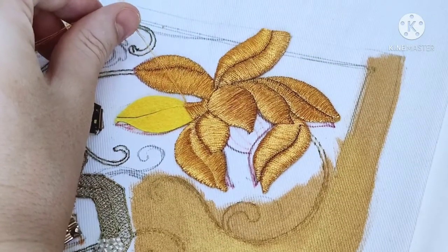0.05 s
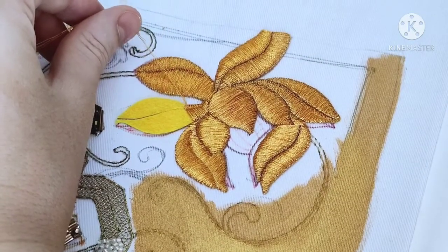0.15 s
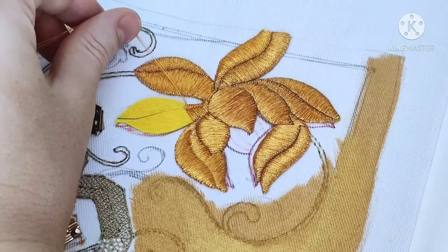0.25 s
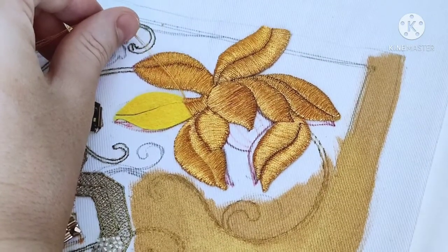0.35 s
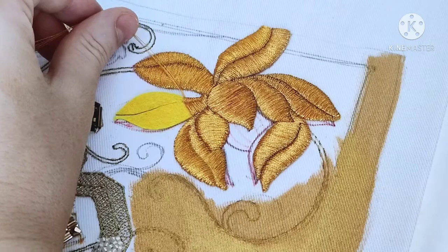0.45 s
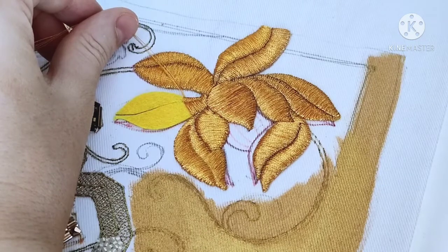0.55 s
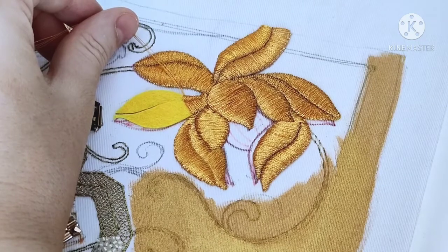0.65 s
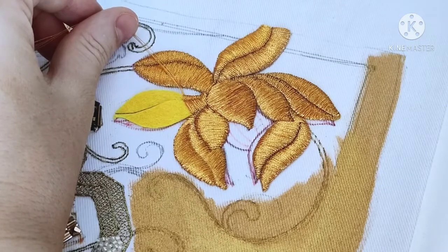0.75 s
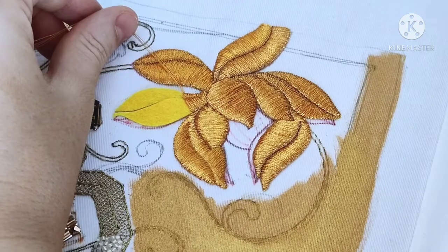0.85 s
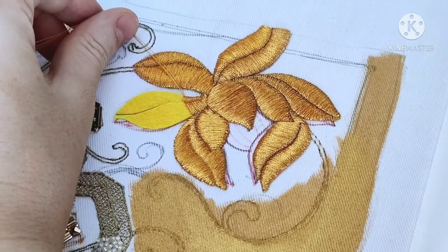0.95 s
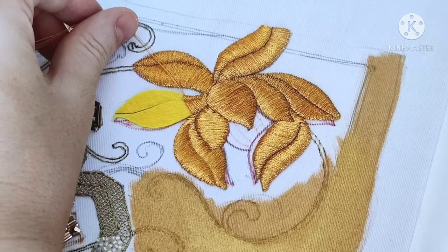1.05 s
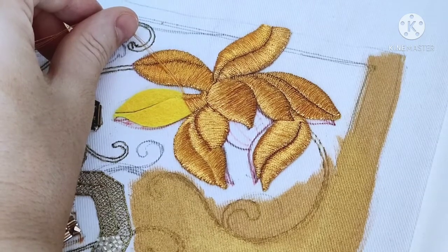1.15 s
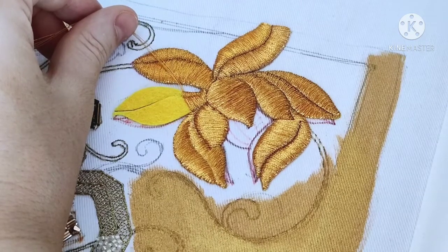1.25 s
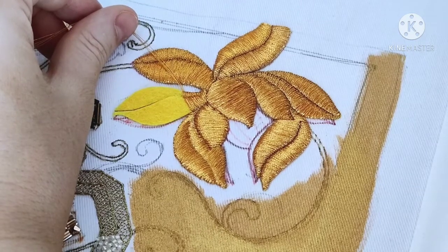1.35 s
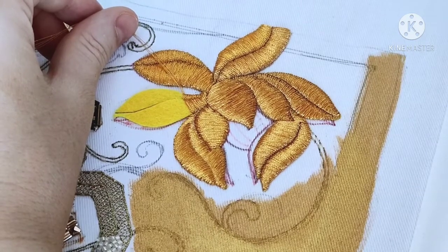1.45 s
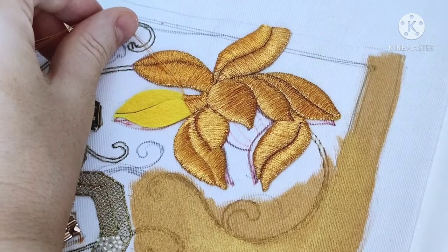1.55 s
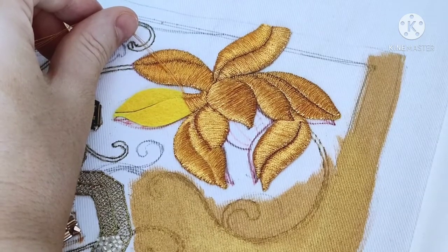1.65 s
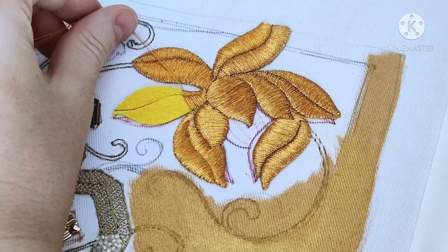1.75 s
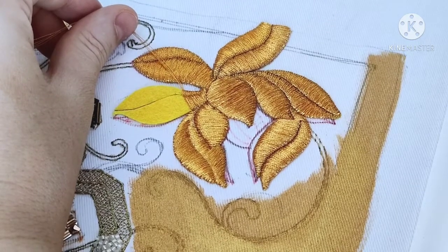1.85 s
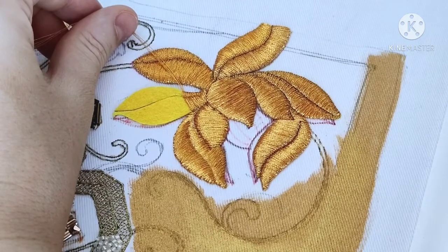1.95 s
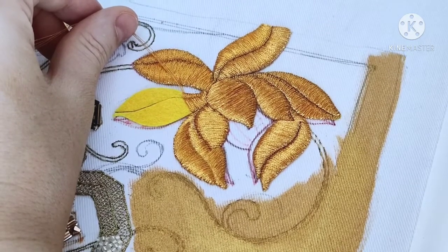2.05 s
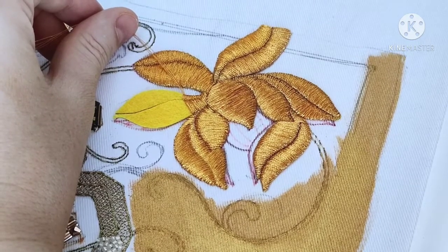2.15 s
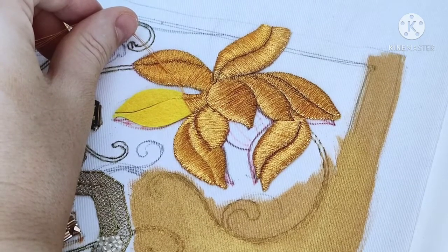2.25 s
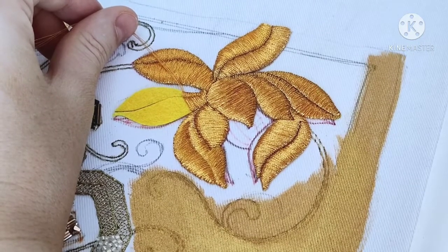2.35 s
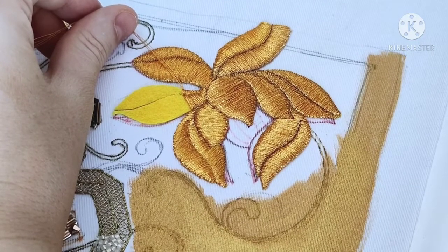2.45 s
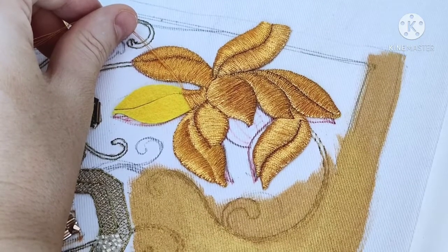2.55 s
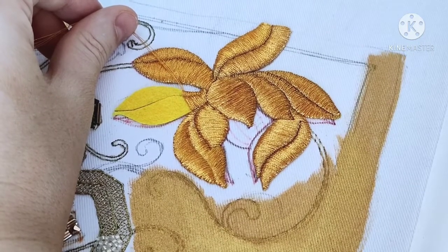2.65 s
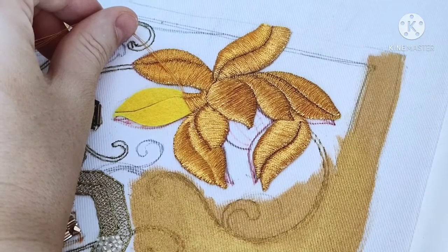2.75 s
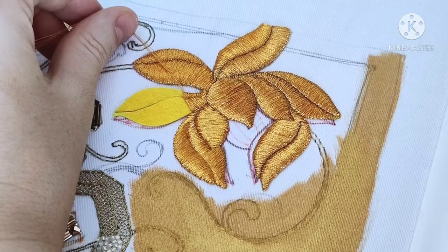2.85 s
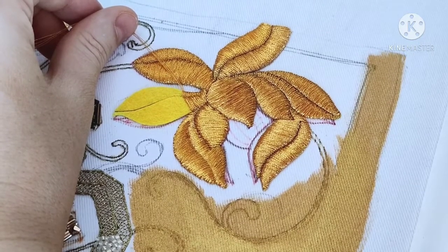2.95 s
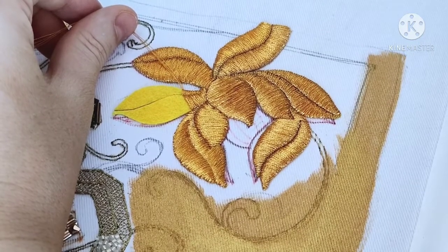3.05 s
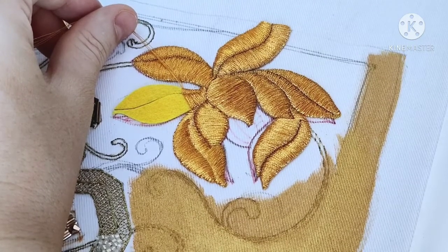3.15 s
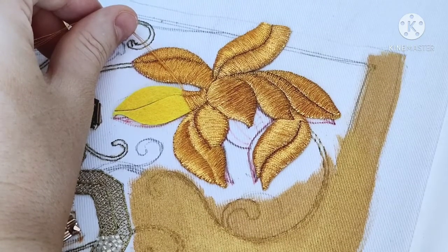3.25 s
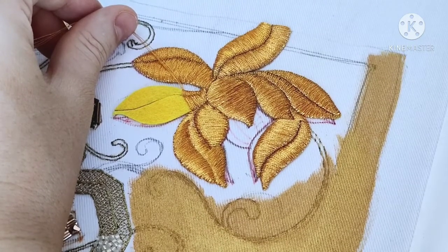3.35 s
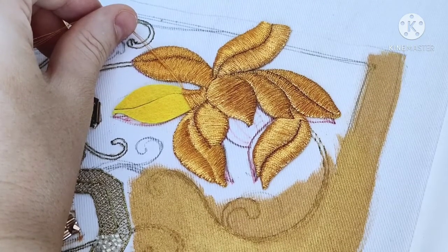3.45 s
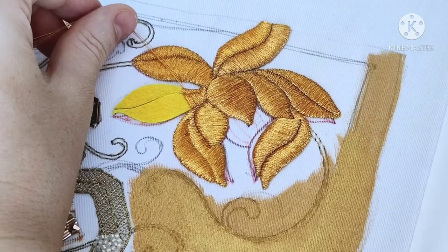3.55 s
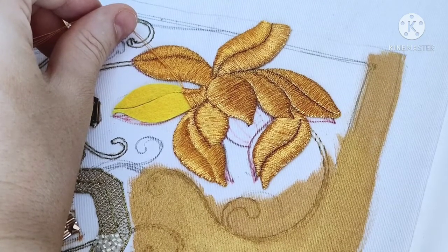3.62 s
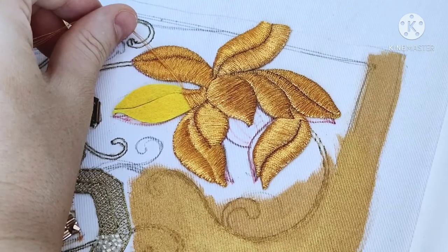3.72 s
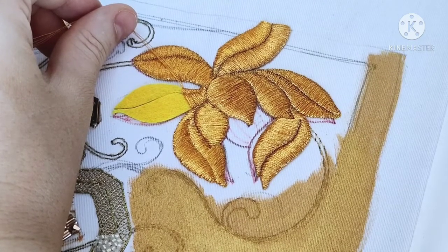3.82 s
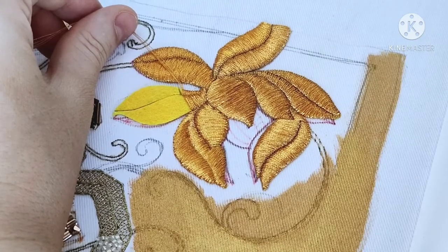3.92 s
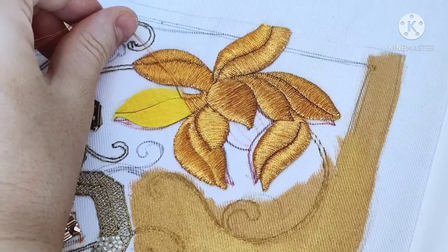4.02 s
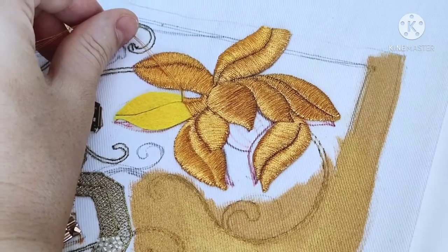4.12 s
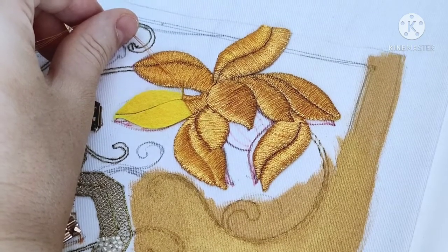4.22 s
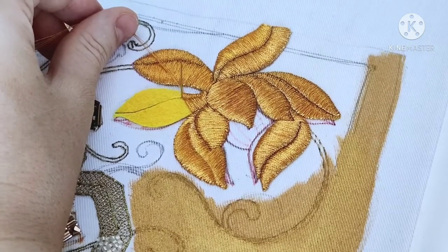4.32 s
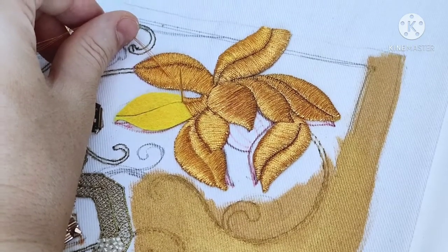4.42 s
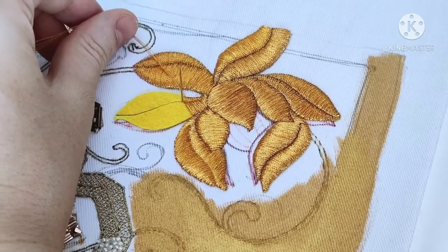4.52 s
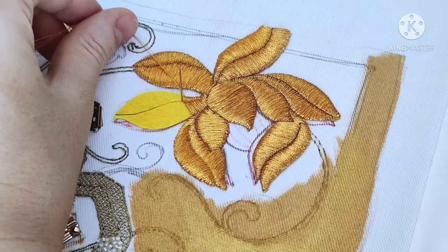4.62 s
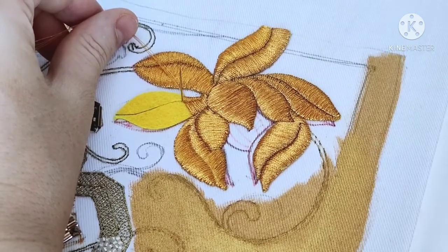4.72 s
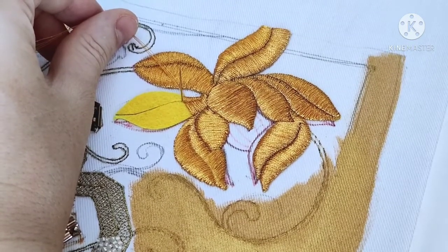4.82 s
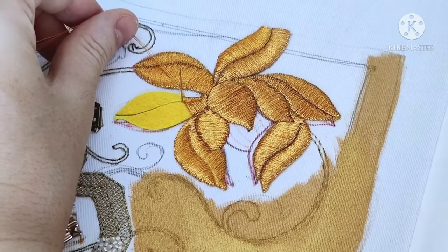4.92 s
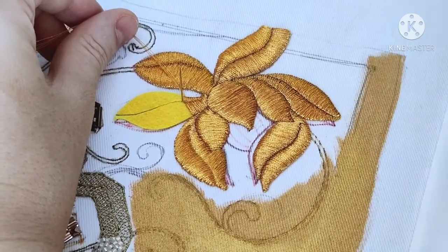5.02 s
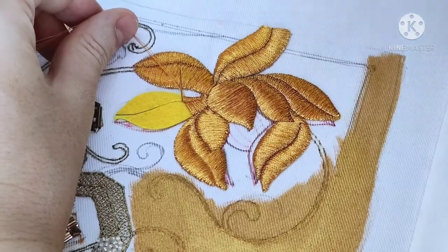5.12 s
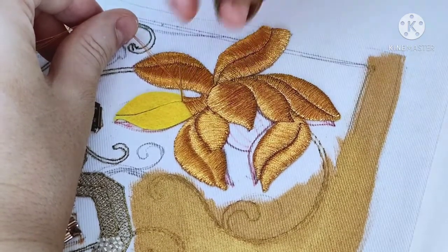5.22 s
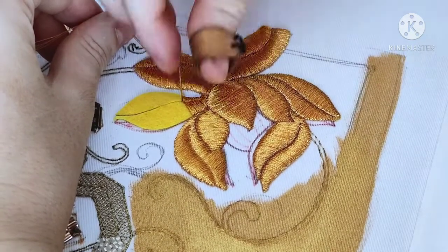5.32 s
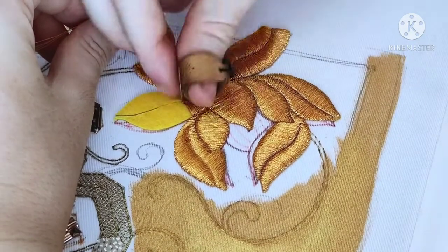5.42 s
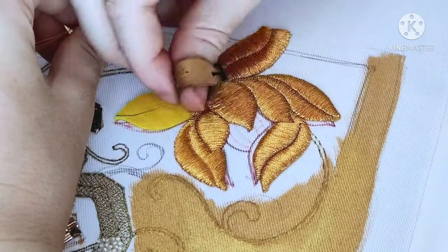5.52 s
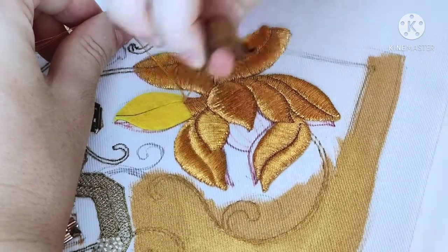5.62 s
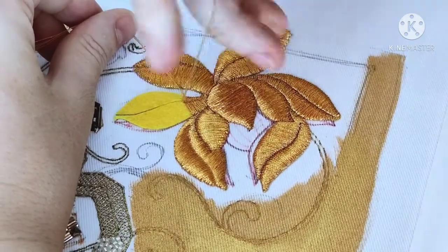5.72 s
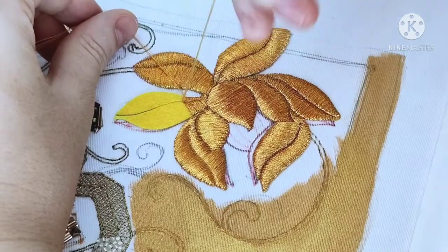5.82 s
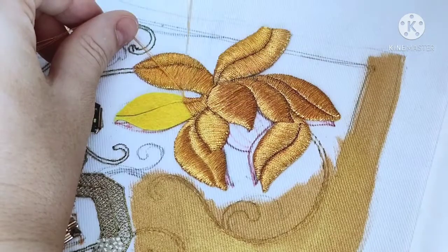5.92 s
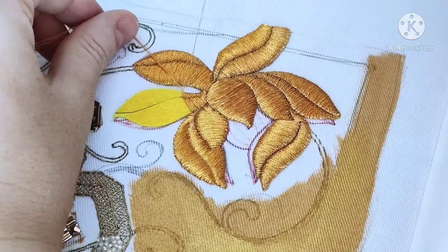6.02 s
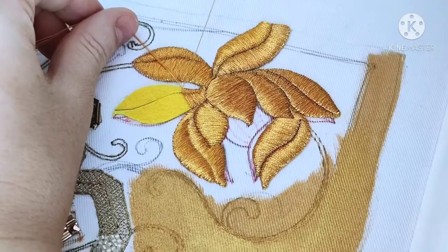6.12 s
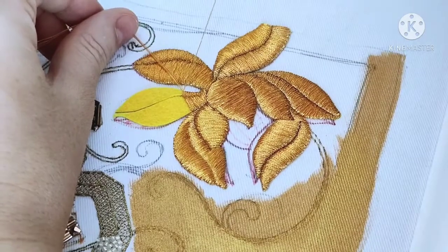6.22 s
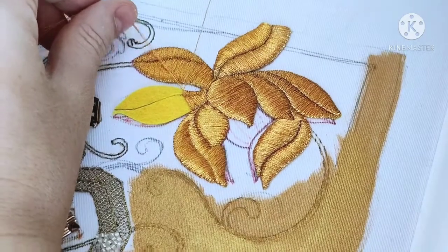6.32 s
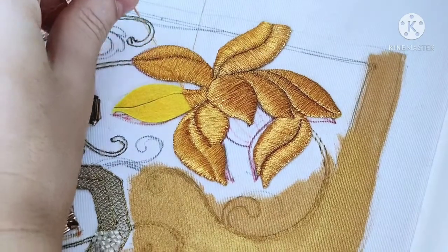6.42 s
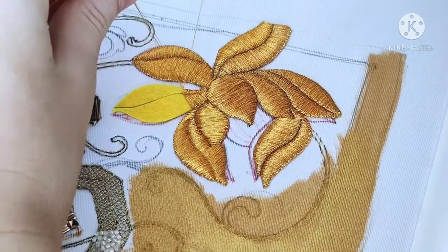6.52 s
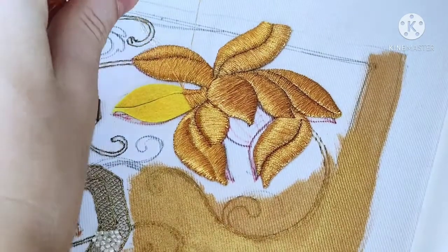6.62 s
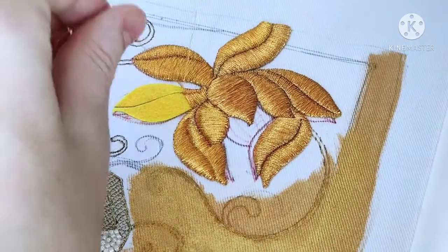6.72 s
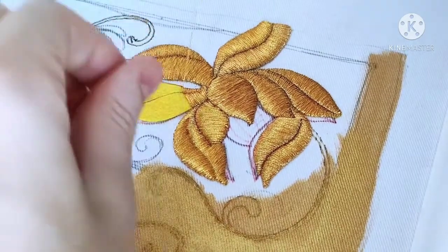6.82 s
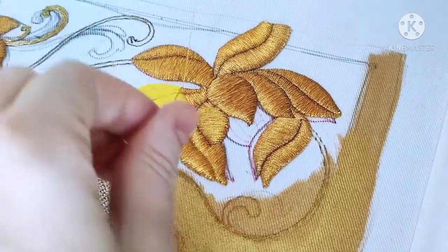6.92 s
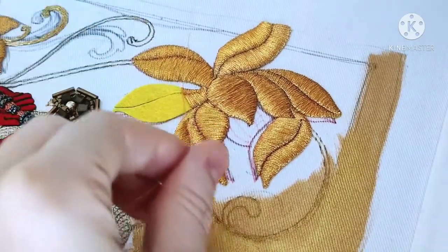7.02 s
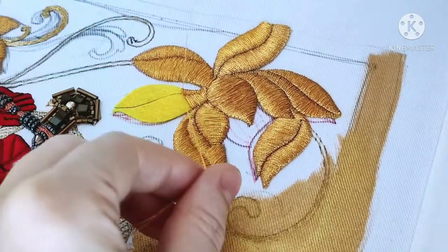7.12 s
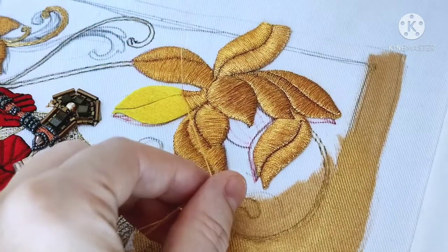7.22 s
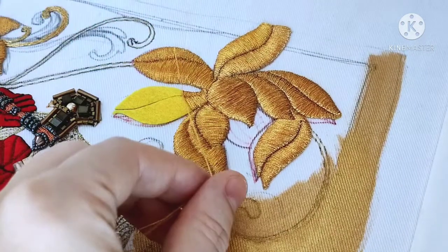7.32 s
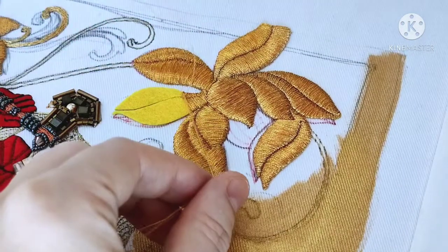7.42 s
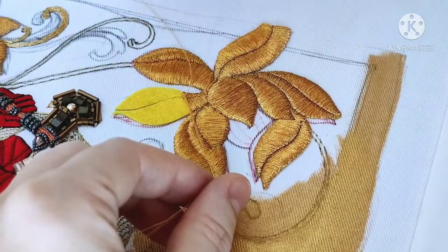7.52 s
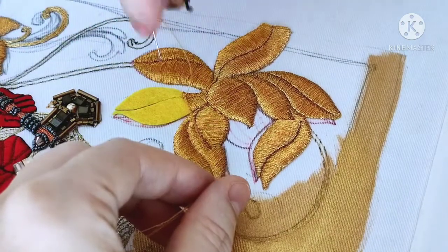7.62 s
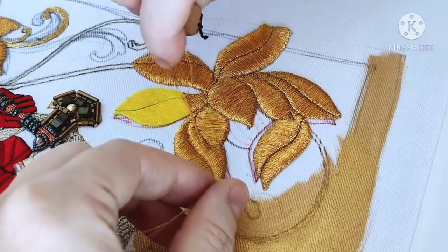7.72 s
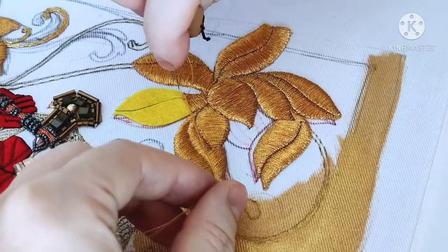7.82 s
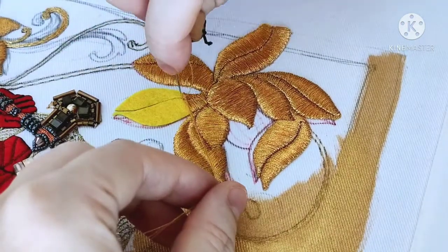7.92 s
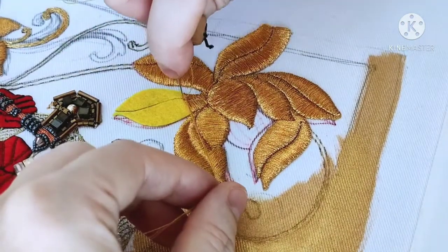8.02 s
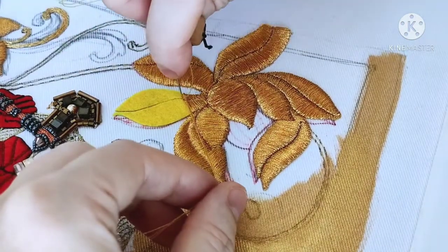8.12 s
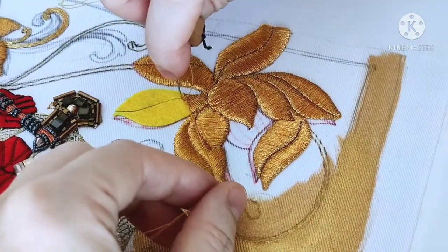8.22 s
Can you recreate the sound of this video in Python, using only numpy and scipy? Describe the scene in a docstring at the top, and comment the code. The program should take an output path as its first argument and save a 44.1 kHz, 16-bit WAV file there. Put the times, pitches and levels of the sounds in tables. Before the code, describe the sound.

In a quiet room, a needle and thread work cloth stretched tight on a frame, heard close in stereo, slightly right. Small dull taps and brief dry rasps come irregularly, then a thump at mid-point. After a pause, a flurry of hollow drum-like thuds and thread sliding follows, easing into faint touches. Low rumble and hum continue, with a distant engine climbing in pitch.

```python
"""A quiet room: a needle and thread go through cloth stretched tight on a frame, close to a pair of microphones.
The cloth, a little to the right, rings like a dull drum: touches and dense slips drive decaying sine modes.
Thread and fingers slide on it with a rasp and a fluttering hiss, which is noise through treble resonances.
Behind: room rumble and microphone hiss from bands of noise, wavering hums from gliding sines and from
narrow noise, and a far engine gaining speed through two gears."""
import sys
import numpy as np
from scipy import signal
from scipy.io import wavfile

SR = 44100
rng = np.random.default_rng(int(sys.argv[2]) if len(sys.argv) > 2 else 0)


def to_wav(s):
    """Save 16-bit WAV."""
    ch = np.atleast_2d(s).T  # columns
    pcm = np.round(np.clip(ch, -1, 1) * 32767)  # PCM
    wavfile.write(sys.argv[1], SR, pcm.astype(np.int16))


N = 364266

# room spectrum before scaling to ROOM_DB: (frequency [Hz], level per Hz [dB])
ROOM_SPECTRUM = [(13, -30), (22, 4.5), (139, -2.5), (215, -9.5), (284, -14), (505, -15.5), (977, -27.5),
                 (2930, -35), (6700, -43.5), (9000, -43.5), (12500, -43.5), (15700, -38.5)]
# correlation of left and right in the room noise: (frequency [Hz], likeness [0 to 1])
ROOM_LIKENESS = [(40, 0.29), (150, 0.69), (400, 0.44), (800, 0.022), (1500, 0.034), (8000, 0.0088)]
# narrow ridges in the rumble: (frequency [Hz], width [Hz], level [dB])
FAINT_HUMS = [(201.7, 2.6, -68.5), (220.4, 7.4, -75), (497, 42, -75)]
# pitch curves of two wavering hums: (time [s], frequency [Hz], level [dB])
HUM_HIGH = [(0, 152.9, -63), (1.6, 155.8, -58.5), (2, 157, -62), (4, 152.4, -68.5), (6, 154.1, -71.5),
            (6.8, 157.8, -63), (7.3, 157.7, -78), (8.26, 151, -58)]
HUM_LOW = [(0, 45.94, -53.5), (1.9, 45.5, -57), (2.25, 48.74, -54.5), (3.3, 48.29, -50.5),
           (3.75, 46.12, -63), (8.26, 42.6, -54.5)]
# the far engine, one list for each of two gears: (time [s], firing rate [Hz], level [dB])
ENGINE_GEARS = [
    [(3.35, 94, -59), (3.6, 97, -54), (5.05, 114.4, -53.5), (5.2, 116, -80)],
    [(5.8, 108.2, -50.5), (6.2, 110.3, -51.5), (6.3, 113, -68), (6.45, 116, -53.5), (6.75, 121, -50),
     (7.25, 125.8, -54.5), (7.45, 125.1, -60), (8.0, 126.9, -57), (8.2, 128.1, -93)],
]
# cloth and frame, one register of modes each, from low to high:
# (frequency [Hz], level within the register [dB], decay by 60 dB [s])
FRAME_MODES = [(63.5, 5, 0.73), (81.8, 11, 0.15), (108, -0.5, 0.34)]
THUD_MODES = [(141.8, -1, 0.25), (192, -5.5, 0.32), (188.3, 5.5, 0.2), (248, -15, 0.12)]
DRUM_MODES = [(288.3, -9.5, 0.24), (310.3, -3.5, 0.28), (361.1, -5.5, 0.26), (389, -1, 0.19),
              (408.2, -1.5, 0.16)]
KNOCK_MODES = [(470, -1, 0.04), (551, -0.5, 0.19), (597, 6.5, 0.049), (669, -7, 0.11), (760, -4.5, 0.055),
               (857, -28, 0.016)]
CRACK_MODES = [(1090, 3, 0.045), (1420, 3, 0.022), (1740, 4, 0.016), (2060, 4, 0.014), (2400, 2, 0.009),
               (2730, 1, 0.009), (3200, -5, 0.007)]
# the taut thread itself: (frequency [Hz], level within the register [dB], decay by 60 dB [s])
THREAD_MODES = [(2080, 0, .05), (2200, 1, .035), (2330, 1, .025), (2450, -2, .02)]
# treble resonances of rubbed fibres: (frequency [Hz], width [Hz], relative level [dB])
FIBRE_RESONANCES = [(3680, 3400, -1), (4360, 1500, 2.5), (5920, 1730, -0.5), (6850, 2000, -0.5),
                    (8600, 1200, -4.5), (10600, 1500, -6.5), (14700, 3200, -8)]
# thread and fingers sliding: (start [s], rise [s], hold [s], fade [s], then nominal levels: drum [dB],
# knock [dB], rasp [dB], thread ring [dB], hiss [dB], bright hiss [dB], top of the hiss [dB])
SLIDES = [(0.711, 0.014, 0.035, 0.069, -55, -77, -71, -95, -86, -83, -94),
          (1.035, 0.0094, .015, 0.036, -56, -74, -73, -93, -84, -73, -90),
          (1.179, 0.013, 0.038, 0.037, -66, -66, -76, -95, -81, -97, -99),
          (1.588, 0.012, 0.038, 0.07, -70, -62, -76, -95, -76, -79, -85),
          (1.743, .01, 0.057, .05, -59, -65, -76, -95, -83, -94, -92),
          (2.14, 0.03, 0.077, 0.065, -79, -65, -74.5, -98, -85, -81, -92),
          (3.924, 0.069, 0.15, 0.038, -61.5, -64.5, -75.5, -100, -87.5, -85, -95),
          (4.151, 0.028, 0.029, 0.12, -53, -65.5, -83, -96, -103, -95, -99),
          (4.306, 0.017, 0.066, 0.026, -47.5, -53.5, -65.5, -70, -73.5, -77.5, -95),
          (4.895, 0.055, 0.03, 0.057, -69, -71, -74, -75, -71.5, -67, -71),
          (5.642, 0.027, 0.223, 0.039, -48, -54, -71, -73, -77, -77.5, -86),
          (5.896, 0.021, 0.04, 0.03, -56, -54.5, -70, -72, -78, -79, -92),
          (5.958, 0.02, 0.075, 0.042, -61.5, -66, -77, -81, -86, -85, -92),
          (6.487, 0.025, 0.099, 0.088, -72, -68, -74, -98, -76, -79, -92),
          (6.865, 0.036, 0.14, .04, -90, -88, -99, -93, -86, -82.5, -90)]
# pricks and taps, levels before the trims in taps(): (time [s], drum [dB], then against the drum:
# weight on the frame [dB], knock [dB], crack [dB], fibre tick [dB])
TAPS = [(0.009, -42.5, -1, -6, -21.5, -34), (0.19, -60.5, 21.5, -11, -24, -33),
        (0.485, -47.5, 1, -8, -17, -31), (0.725, -45.5, 7.5, 0.5, -16, -36), (0.738, -56, 14, 5, -3, -19),
        (0.747, -46, 3, -2, -15, -32), (1.047, -44.5, -11, -9, -16, -21), (1.107, -49, -16, 2.5, -18, -33),
        (1.199, -52, -10, 9, -6, -32), (1.223, -51, -9, -2.5, -8.5, -22.5), (1.306, -49, -9, -3, -21, -42),
        (1.587, -50.5, -12, -1, -15, -28), (1.607, -47.5, -25, -10, -9, -17),
        (1.622, -50, -10, 3, -22, -32), (1.76, -45, 0, -3, -26, -27), (1.788, -39.5, -2, -2.5, -14.5, -44),
        (1.797, -49, 8.5, 5.5, -33, -42), (2.149, -53, -10, 8.5, -15, -31), (2.187, -39, -13, 3, -9.5, -25),
        (2.193, -40, -14, -2, -22, -40), (2.25, -44, -9, 3, -16, -34), (2.85, -46.5, -5, 3.5, -25, -40),
        (3.417, -58.5, 15, 2, -12, -27), (3.555, -45, -6, -4, -20.5, -32), (3.572, -51, 3, 3, -11, -24),
        (3.975, -49.5, 2, -8, -27, -44), (4.058, -50, -8, -1, -27, -43), (4.193, -45.5, 7, -21, -31, -42),
        (4.226, -53, -2, -30, -34, -39), (4.315, -51.5, 14.5, -6, -14, -30),
        (4.335, -43, -13, -3, -30, -31), (4.353, -58, -6, -2, -18, -30), (4.393, -43, 5.5, -7, -29, -39),
        (4.496, -30.5, -2, -3, -26.5, -51), (4.504, -36.5, -14, -8.5, -38, -54),
        (5.523, -48, 12, 2, -26, -48), (5.617, -47.5, 0, -4, -19, -29), (5.662, -48, 3, -20, -17, -30),
        (5.677, -21, 4.5, -12, -28.5, -56), (5.692, -52, 21, -5, -21, -48), (5.732, -34, 11, -12, -36, -42),
        (5.762, -34.5, -3, -6.5, -25, -42), (5.798, -39, -21, -32, -33, -43),
        (5.829, -36, 1.5, -21, -35, -48), (5.875, -38, -21, -25, -37, -42),
        (5.918, -46.5, -12, -18, -22, -48), (5.937, -43.5, -17, -7, -30, -42),
        (5.954, -37.5, -8, -21, -32, -43), (6.045, -55, 0, -2, -22, -33), (6.056, -54.5, 24, -9, -21, -34),
        (6.19, -56.5, 14, 2, -29, -26), (6.215, -56, 5, 1, -27, -34), (6.526, -42, 0.5, -5, -33, -44),
        (6.539, -52.5, -3, 2, -18, -22), (6.728, -65, 9, -6, -24, -31), (6.806, -62, -2, 6, -21, -22),
        (6.881, -64, -4, 8, -23, -22)]

ROOM_DB, ROOM_SWELL_DB, RUMBLE_FLICKER_DB = -54, 0.3, 1.9  # overall level; spread of slow and quick changes
STEADY_ABOVE_HZ = 4500  # around here the noise turns from unsteady to steady
ENGINE_WAVER_DB = 0.8
SLIDE_SWING_DB, SLIDE_THUD_DB = 22.5, 1  # how far a slide rises and fades; its thud against the drum
FLUTTER_DB, HISS_FLUTTER_DB = 1.2, 1.6  # a slide drags unevenly, its hiss flutters faster
LIGHT_DB = -52  # drum level of a light tap
# the thud grows with weight and with strength over a light tap [dB, dB per dB, dB per dB]
THUD_DB, THUD_PER_WEIGHT, THUD_PER_STRENGTH = -11.5, 0.52, 0.1
LUCK_DB = 1.8  # chance in how a touch strikes each mode
MIC_BASS_HZ, CUTOFF_HZ = 43.6, 15750  # the microphones lose what lies below; the steep cut at the top


def from_db(db):
    """Decibels to amplitude gain."""
    return 10 ** (np.asarray(db) / 20)


def rms_one(x):
    """Scale to unit power."""
    return x / np.sqrt(np.mean(x ** 2) + 1e-20)


def in_time(rows):
    """Columns as curves per sample, after a gate that fades over 10 ms at the table's ends."""
    s, *columns = np.transpose(rows)
    t = np.arange(N) / SR
    gate = np.clip(np.minimum(t - s[0], s[-1] - t) / 0.01, 0, 1)
    return gate, *[np.interp(t, s, column) for column in columns]


def at_hz(points, hz):
    """Read a table on a log-frequency axis."""
    table_hz, values = np.array(points).T
    return np.interp(np.log(hz), np.log(table_hz), values)


def drift(rate_hz):
    """Slow random curve of spread 1: noise at every 40th sample, smoothed by two equal poles."""
    pole = np.exp(-80 * np.pi * rate_hz / SR)
    noise = rng.standard_normal(N // 40 + 2002)
    slow = signal.lfilter([1], [1, -2 * pole, pole ** 2], noise)[2000:]  # skip the filter's start
    return np.interp(np.arange(N) / 40, np.arange(len(slow)), rms_one(slow))


def decay_per_sample(t60):
    """Gain per sample of a fall by 60 dB in t60 seconds."""
    return from_db(-60 / (t60 * SR))


def ring(force, hz, t60):
    """A resonance: a unit click sets a decaying sine of height 1 ringing."""
    r, w = decay_per_sample(t60), 2 * np.pi * hz / SR
    return signal.lfilter([0, np.sin(w)], [1, -2 * r * np.cos(w), r * r], force + 1e-18)


def t60_of_width(width_hz):
    """A broader resonance dies sooner."""
    return np.log(1000) / (np.pi * width_hz)


def room():
    """Roughly third-octave bands of stereo noise: rumble alike on both sides, hiss nearly unrelated."""
    out, edges = 0, np.geomspace(22, 17000, 26)
    white = rng.standard_normal((2, 2, N))  # neighbouring bands use different noise
    for k, (low, high) in enumerate(zip(edges, edges[1:])):
        band = signal.butter(2, [low, high], "band", fs=SR, output="sos")
        mid, side = signal.sosfilt(band, white[k % 2])
        hz = np.sqrt(low * high)
        alike = np.clip(at_hz(ROOM_LIKENESS, hz), 0, 1)
        unsteady = 1 / (1 + (hz / STEADY_ABOVE_HZ) ** 2)
        changes_db = ROOM_SWELL_DB * drift(0.55) + RUMBLE_FLICKER_DB * drift(14.0)
        gain = from_db(at_hz(ROOM_SPECTRUM, hz) + unsteady * changes_db)
        out = out + gain * (np.sqrt(1 + alike) * mid + np.sqrt(1 - alike) * side * [[1], [-1]])
    return from_db(ROOM_DB) * rms_one(out)


def faint_hums():
    """Noise through narrow resonances: tones that come and go, the same on both sides."""
    noise = rng.standard_normal(N)
    return sum(from_db(db) * rms_one(ring(noise, hz, t60_of_width(width)))
               for hz, width, db in FAINT_HUMS)


def tone(table, waver_db, overtone_db, lag):
    """A low sine and its octave on a pitch curve, level wavering; lag in radians between the sides."""
    gate, hz, db = in_time(table)
    phase = 2 * np.pi * np.cumsum(hz) / SR + np.array([[0], [lag]])
    shape = np.sin(phase) + from_db(overtone_db) * np.sin(2 * phase)
    return gate * np.sqrt(2) * from_db(db + waver_db * drift(5)) * shape


def hums():
    """Two gliding tones, a high and a low one, each swelling and sinking."""
    high = tone(HUM_HIGH, waver_db=2.5, overtone_db=-34, lag=0.6)
    return high + tone(HUM_LOW, waver_db=2.0, overtone_db=-27, lag=1.0)


def engine():
    """The firing of a far engine as a tone whose pitch climbs in each of two gears."""
    return sum(tone(gear, waver_db=ENGINE_WAVER_DB, overtone_db=-24, lag=0.57) for gear in ENGINE_GEARS)


def cloth(force, modes, luck=None):
    """One register of modes starting together; the soft contact takes away what lies above it."""
    rings = 0
    for k, (hz, db, t60) in enumerate(modes):
        push = force if luck is None else force * luck[k]
        rings = rings + from_db(db) * ring(push, hz, t60)
    soft = signal.butter(2, modes[-1][0] * 1.02, fs=SR, output="sos")
    small = signal.butter(2, modes[0][0] / 0.79, "high", fs=SR, output="sos")  # a small patch radiates no bass
    return signal.sosfilt(np.vstack([soft, small]), rings)


def close_by(x, count=4):
    """The cloth lies a little to the right: the left side is weaker and count samples late."""
    return np.array([from_db(-2.25) * np.roll(x, count), from_db(-0.4) * x])


def grit(per_s, spread_db, size):
    """Random slips of uneven strength and either direction, in size channels."""
    strength = from_db(spread_db * np.minimum(rng.exponential(1, (size, N)), 5))
    slips = strength * rng.choice([-1, 1], (size, N))
    return slips * (rng.random((size, N)) < per_s / SR)


def fibres(force):
    """Broad treble resonances of rubbed fibres, ringing on whatever drives them."""
    out = 0
    for k, (hz, width, db) in enumerate(FIBRE_RESONANCES):
        gain = from_db(db) * np.sqrt(width / SR) * (-1) ** k  # neighbours in opposite sign
        out = out + gain * ring(force, hz, t60_of_width(width))
    return out


def fibre_hiss():
    """Dense slips set the fibres hissing, partly alike on both sides."""
    own, shared = grit(10000, spread_db=5.5, size=2), grit(8000, spread_db=-2.5, size=1)
    return rms_one(fibres(own + 0.45 * shared))


def slides(hiss):
    """The thread catches on the weave in dense uneven slips that drive the modes of cloth and thread."""
    catches, slips = grit(800, spread_db=1.0, size=1)[0], grit(3000, spread_db=0.0, size=2)
    thud, drum, knock = (close_by(rms_one(cloth(catches, modes)))
                         for modes in [THUD_MODES, DRUM_MODES, KNOCK_MODES])
    body = drum + from_db(SLIDE_THUD_DB) * thud
    rasp = np.sqrt(2) * rms_one(cloth(slips + 0.14 * catches, CRACK_MODES))
    rasp = rasp * from_db(0.36 * drift(22))
    thread = rms_one(cloth(slips + 2.5 * catches, THREAD_MODES))
    hiss = hiss * from_db(HISS_FLUTTER_DB * drift(46))
    layers = [body, knock, rasp, thread]
    for hz, kind in [(6600, "low"), ([7600, 11000], "band"), (11000, "high")]:  # hiss, bright hiss, its top
        band = signal.butter(3, hz, kind, fs=SR, output="sos")
        layers.append(np.sqrt(2) * rms_one(signal.sosfilt(band, hiss)))
    out = np.zeros((2, N))
    for start, rise, hold, fade, *levels_db in SLIDES:
        corners = np.cumsum([start, rise, hold, fade])
        gate, swell_db = in_time(list(zip(corners, [-SLIDE_SWING_DB, 0, 0, -SLIDE_SWING_DB])))
        on = gate > 0
        for layer, db in zip(layers, levels_db):
            out[:, on] += gate[on] * from_db(db + swell_db[on]) * layer[:, on]
    return out * from_db(FLUTTER_DB * drift(5.6))


def taps(hiss):
    """Each touch strikes every mode with a strength of its own, scuffs briefly and sprays fibre noise."""
    s, drum_db, frame_db, knock_db, crack_db, tick_db = np.transpose(TAPS)
    thud_db = THUD_DB + THUD_PER_WEIGHT * frame_db + THUD_PER_STRENGTH * (drum_db - LIGHT_DB)
    at, out = np.round(s * SR).astype(int), np.zeros((2, N))
    touch = np.zeros(N, int)
    touch[at] = np.arange(len(at))
    touch = np.maximum.accumulate(touch)  # index of the latest touch
    scuff = rms_one(grit(1500, spread_db=3.0, size=1)[0])
    # (modes, blow against the drum [dB], scuff against the blow [dB], scuff's decay by 60 dB [s])
    registers = [(FRAME_MODES, frame_db - 7.5, -50, 0.09), (THUD_MODES, thud_db, -45, 0.09),
                 (DRUM_MODES, -3.0, -36, 0.09), (KNOCK_MODES, knock_db - 9.5, -22, 0.03),
                 (CRACK_MODES, crack_db - 3.0, -16, 0.025)]
    for modes, share_db, scuff_db, scuff_s in registers:
        blows = np.zeros(N)
        blows[at] = -from_db(drum_db + share_db)  # the cloth is pushed away first
        scuff_swell = signal.lfilter([1], [1, -decay_per_sample(scuff_s)], blows + 1e-18)
        blows += from_db(scuff_db) * scuff * scuff_swell
        luck = from_db(rng.normal(0, LUCK_DB, (len(at), len(modes))))
        if modes is CRACK_MODES:  # fine modes start in either direction: a burst, not one spike
            luck = luck * rng.choice([-1, 1], luck.shape)
        rings = cloth(blows, modes, luck.T[:, touch])
        # the slow swing of the frame reaches the two sides out of step
        out += close_by(rings, count=round(4 + (380 / modes[0][0]) ** 2))
    ticks = np.zeros(N)
    ticks[at] = from_db(drum_db + tick_db + 9.0)
    fall = decay_per_sample(0.011)
    # swells for a millisecond or two, then dies; e brings its peak to the height of the tick
    spray = np.e * signal.lfilter([1 - fall], [1, -2 * fall, fall ** 2], ticks + 1e-18)
    snap = from_db(21.5) * close_by(fibres(ticks), count=1)  # comes before the spray's peak
    return out + spray * hiss + snap


def scene():
    """Room, hums and engine behind, the cloth close by."""
    hiss = fibre_hiss()
    return room() + faint_hums() + hums() + engine() + slides(hiss) + taps(hiss)


def record(dry):
    """At the microphones the deep bass falls away and the top is cut steeply."""
    thin = signal.sosfilt(signal.butter(2, MIC_BASS_HZ, "high", fs=SR, output="sos"), dry)
    return signal.sosfilt(signal.ellip(12, 0.5, 60, CUTOFF_HZ, fs=SR, output="sos"), thin)


dry = scene()
out = record(dry)
to_wav(out)
```